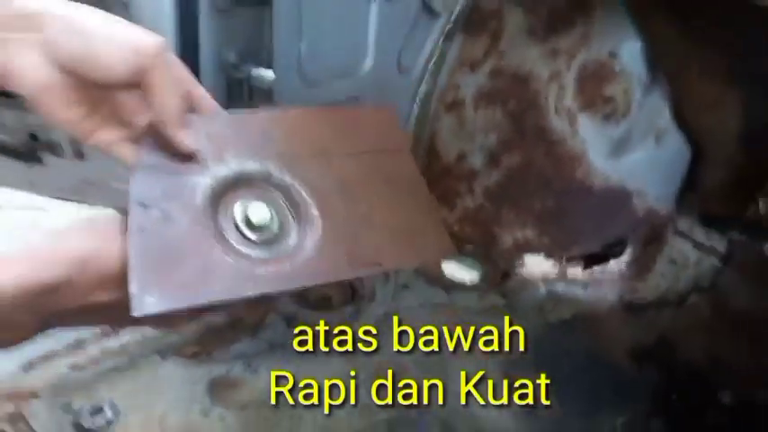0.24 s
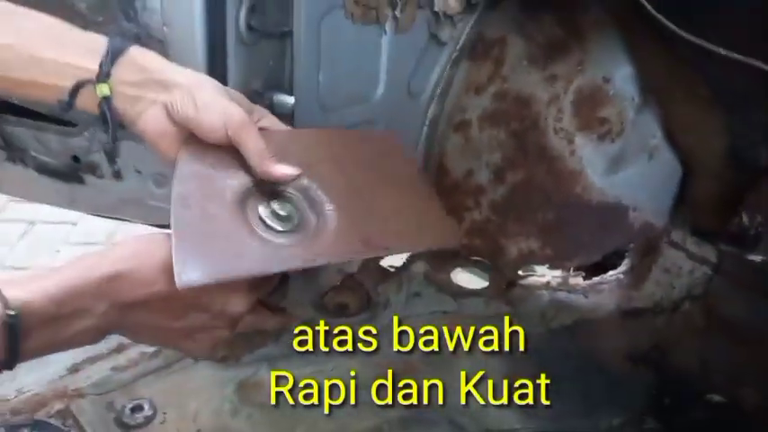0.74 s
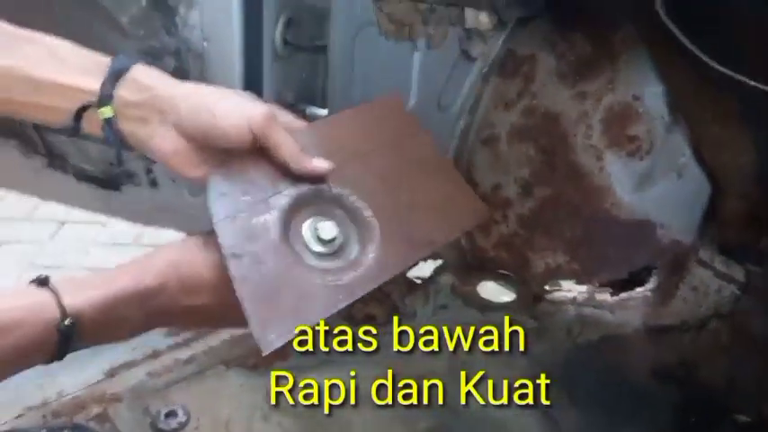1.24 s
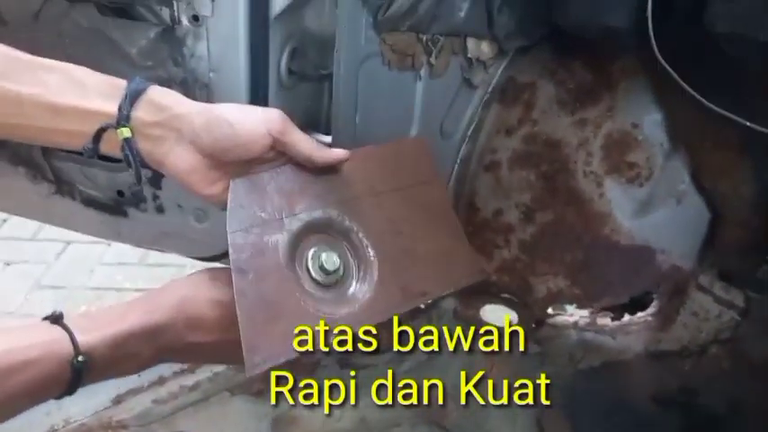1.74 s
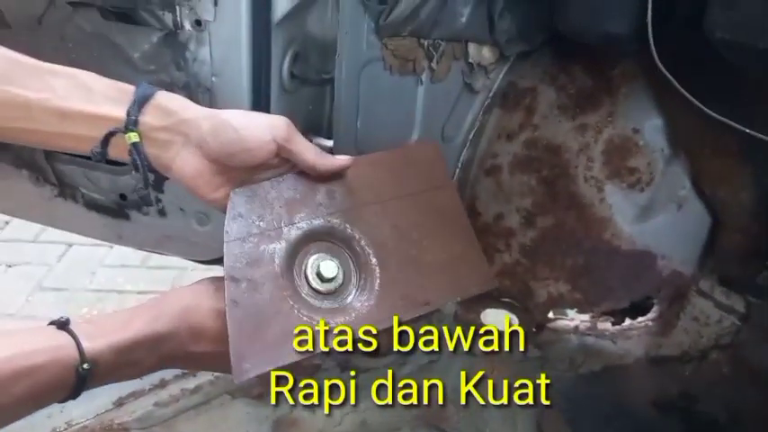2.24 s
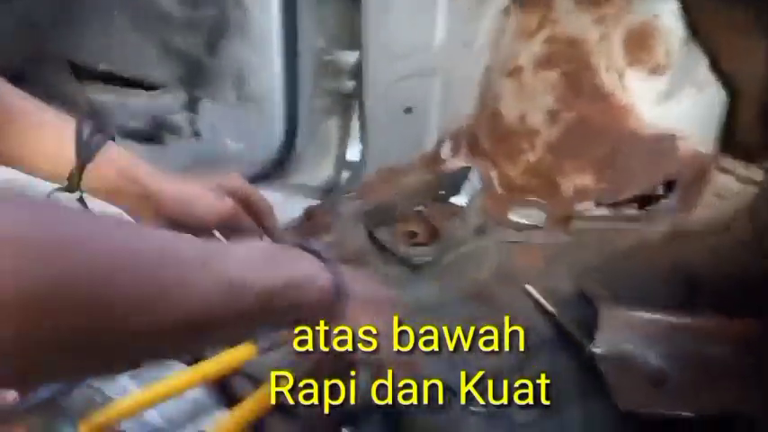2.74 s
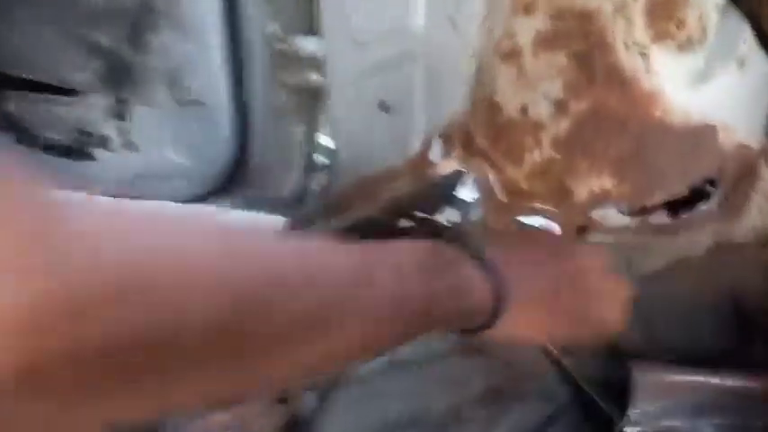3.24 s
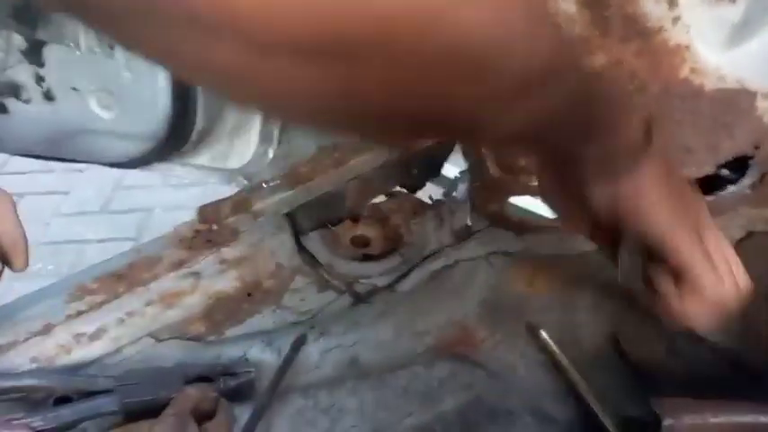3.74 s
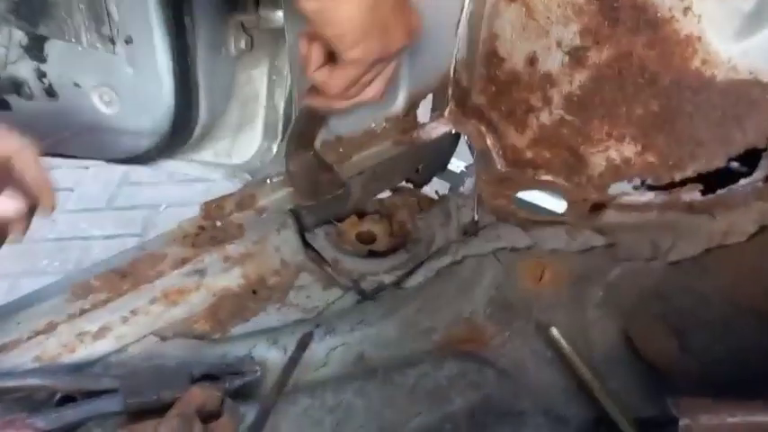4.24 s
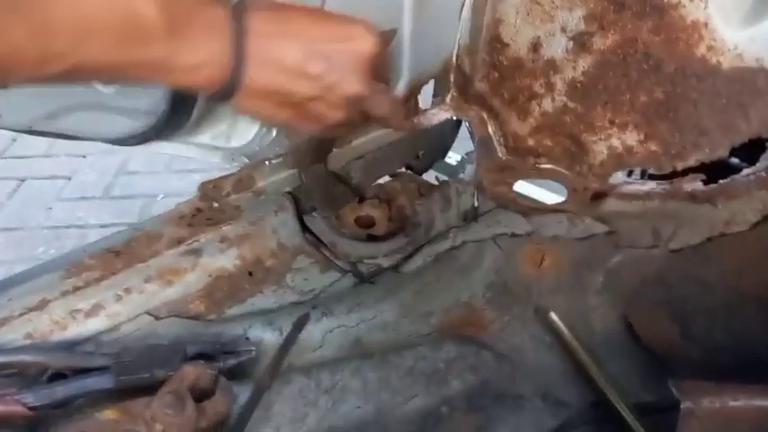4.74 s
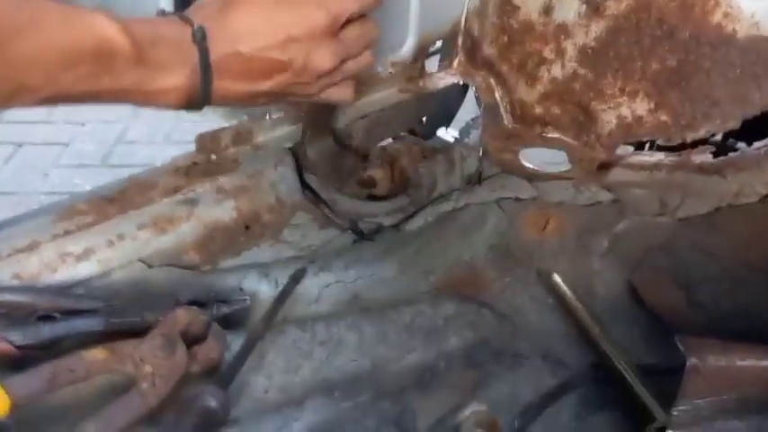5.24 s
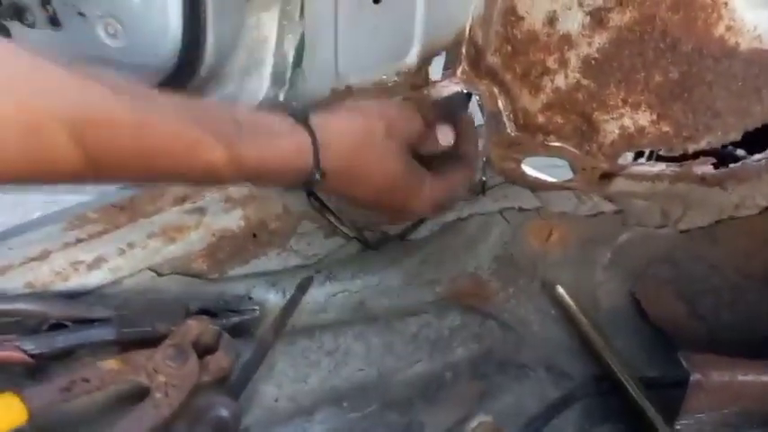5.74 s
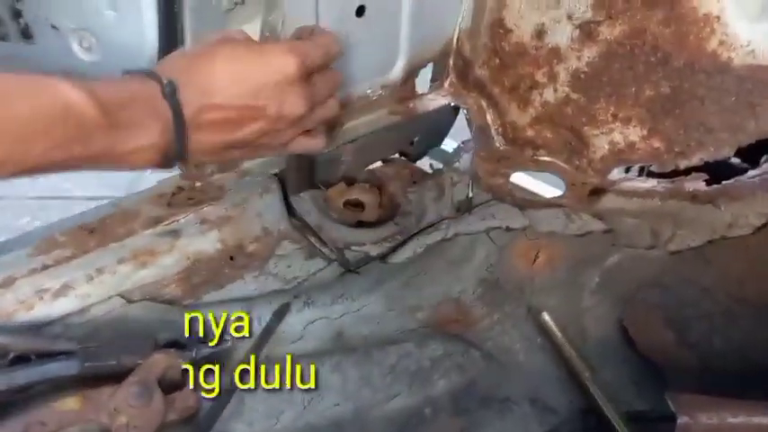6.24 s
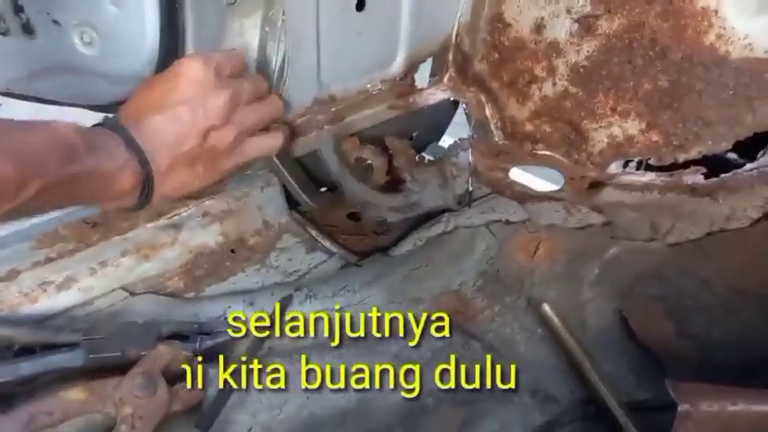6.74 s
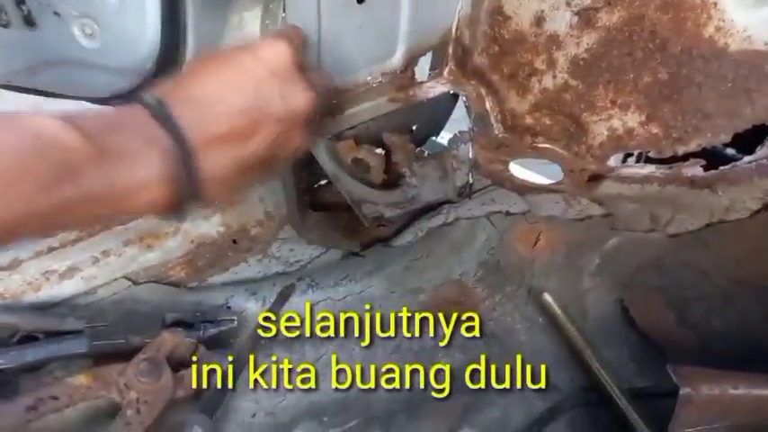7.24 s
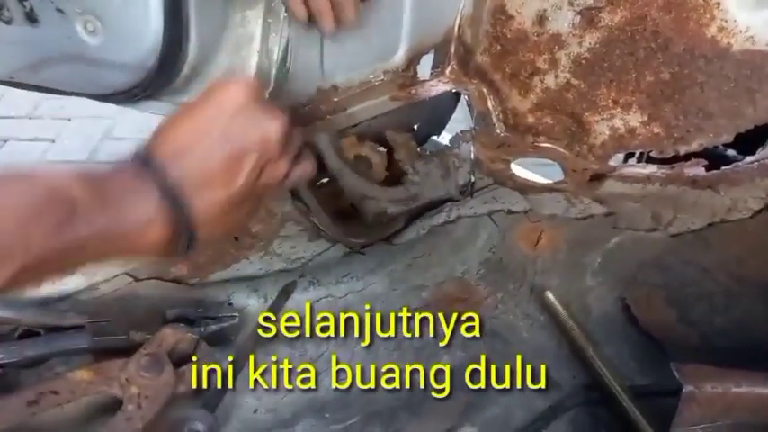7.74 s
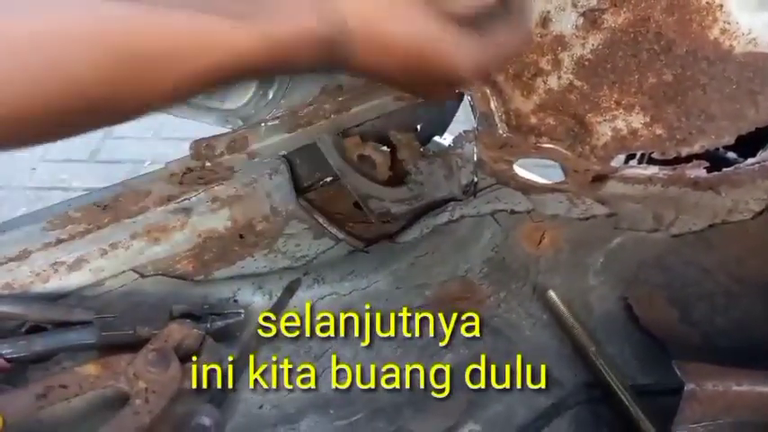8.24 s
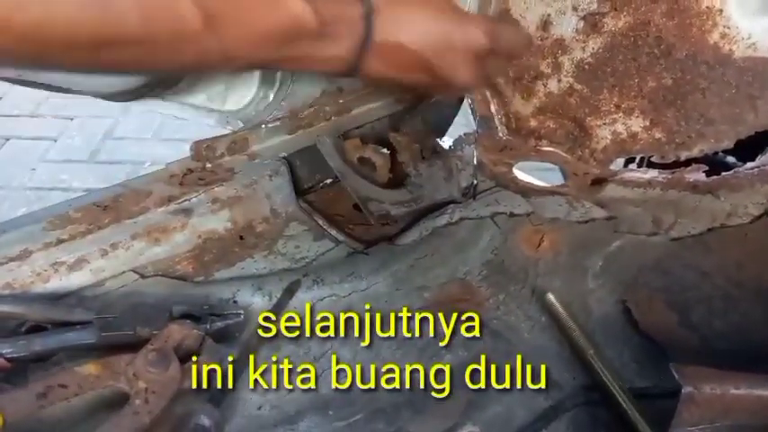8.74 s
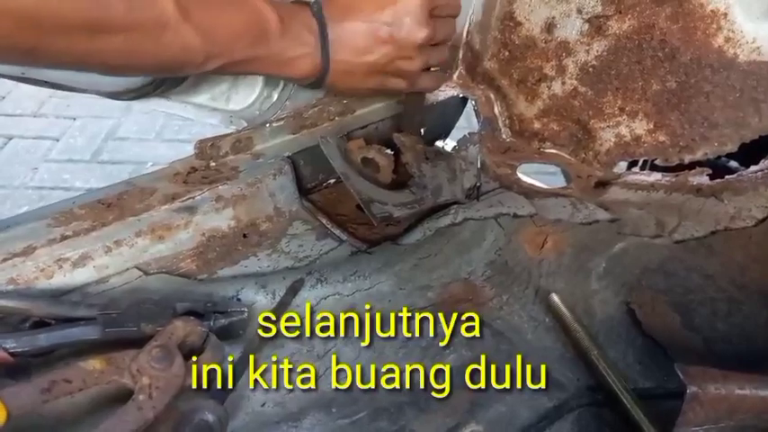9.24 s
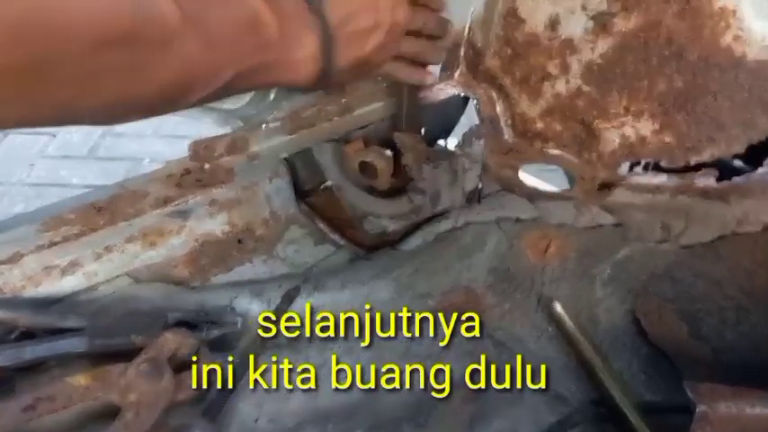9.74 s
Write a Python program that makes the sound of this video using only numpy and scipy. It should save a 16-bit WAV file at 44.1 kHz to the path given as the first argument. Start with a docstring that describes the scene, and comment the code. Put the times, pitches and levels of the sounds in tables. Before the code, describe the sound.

After faint creaks of a metal plate, a chisel pries at rusted car bodywork with uneven knocks, gritty scrapes and clanks.

```python
"""A chisel knocks, bites and slips in a rusted seam of a car's steel floor pan.
Each blow excites the pan's modes, so it booms and clanks; stick-slip friction drives the same modes as
a scrape, rust flakes snap and clink, and the sheet hums. Before this work and a short silence,
a hand-held patch plate creaks against the floor. Two microphone ports stand close by, in an open
workshop with a low rumble."""
import sys
import numpy as np
from scipy import signal
from scipy.fft import rfft, irfft, next_fast_len
from scipy.io import wavfile
from scipy.ndimage import uniform_filter1d, map_coordinates

SR = 44100
rng = np.random.default_rng(int(sys.argv[2]) if len(sys.argv) > 2 else 0)


def wrap_up_sound(samples):
    """Save the sound to the file named by the first command line argument, as 16-bit audio."""
    columns = np.atleast_2d(samples).T
    # keep every value between -1 and 1, then stretch to whole-number steps
    tamed = np.clip(columns, -1, 1)
    steps = np.round(tamed * 32767).astype(np.int16)
    wavfile.write(sys.argv[1], SR, steps)


N = 441000
TIME = np.arange(N) / SR
RING_TIME = np.arange(SR // 2) / SR  # seconds since an excitation
SILENCE_START_S, SILENCE_END_S = 2.387, 2.492

# Levels in the tables are relative: each source adds its own gain.
# likeness of the sound at the two ports: (frequency [Hz], correlation [-])
PORT_CORRELATION = [(150, 0.97), (300, 0.93), (550, 0.71), (1000, -0.00024), (2500, -0.062), (12000, 0.045)]
# workshop rumble and hiss: (frequency [Hz], spectral density [dB])
RUMBLE_SPECTRUM = [(20, -44), (35, -24.5), (50, -7), (68, -2.5), (100, -3), (135, -18.5), (220, -24.5),
                   (500, -36), (1200, -69.5)]
HISS_SPECTRUM = [(100, -12), (300, -4), (550, -2.5), (1000, -9.5), (2000, -13.5), (5800, -19),
                 (7800, -11.5), (9500, -16.5), (16000, -17)]
# rumble during the work: (time [s], level [dB])
RUMBLE_LEVELS = [(2.9, -61.5), (5.15, -62), (7.84, -58), (8.4, -65.5), (8.61, -51.5), (10.0, -61.5)]
# partials of the faint opening tone: (frequency [Hz], level [dB])
OPENING_PARTIALS = [(530, -52.5), (562, -60), (1090, -76)]
# thin tones: (start [s], duration [s], frequency [Hz], level [dB])
THIN_TONES = [(3.003, .18, 2720, -86), (3.228, 0.23, 3430, -70.5), (7.043, 0.048, 3500, -71),
              (7.641, .18, 1470, -77), (8.203, 0.18, 1442, -75.5), (8.295, 0.14, 2710, -80),
              (9.651, 0.059, 1404, -63)]
# slips of the patch plate and ticks of its edge: (time [s], level [dB])
PLATE_CREAKS = [(0.799, -61), (0.813, -60), (.831, -51.5), (0.843, -48), (0.874, -50), (0.899, -50),
                (1.019, -60.5), (1.078, -48), (1.111, -55), (1.385, -69), (1.484, -62.5)]
EDGE_TICKS = [(0.245, -68.5), (1.08, -56), (1.158, -53)]
# fingers sliding on the plate: (start [s], duration [s], level [dB])
SLIDES = [(0.517, 0.21, -78), (1.453, 0.27, -78)]
# hand-damped plate, edge tick, fingers, light rustle, rust snap: (frequency [Hz], spectral density [dB])
PLATE_SPECTRUM = [(200, -27), (580, -3.5), (760, -7), (930, 0.5), (1240, -2), (1490, -3), (1850, -2.5),
                  (2900, -30), (5500, -24), (15000, -30)]
TICK_SPECTRUM = [(1500, -8.5), (4000, -11), (6900, -3.5), (8500, -3), (11000, -14), (13000, -14),
                 (16000, -17)]
FINGER_SPECTRUM = [(1000, -14), (4500, -15), (6300, -11), (7800, 2), (9000, -13), (16000, -12)]
RUSTLE_SPECTRUM = [(100, -25.5), (300, -7), (900, -3), (1400, 0), (2100, -6.5), (3100, -12.5), (5500, -16),
                   (7800, -11), (9700, -19), (12000, -15), (16000, -22)]
SNAP_SPECTRUM = [(2000, -26), (4000, -17), (6500, -18), (7800, -3.5), (9500, -11), (11800, -4),
                 (13000, -10), (14300, -6.5), (16000, -24.5)]
# rustle of hand and tool on the metal: (time [s], level [dB])
RUSTLE_LEVELS = [(2.6, -95), (2.68, -67.5), (3.28, -96), (3.59, -65.5), (4.33, -83.5), (5.5, -84),
                 (5.98, -58.5), (6.27, -84), (6.72, -55.5), (7.03, -84.5), (7.38, -93), (7.48, -71),
                 (8.14, -90), (8.47, -80.5), (8.7, -66.5), (9.13, -63.5), (9.56, -85), (10.0, -61)]
# rust flakes breaking off: (time [s], level [dB])
RUST_SNAPS = [(6.126, -45), (6.371, -50), (6.651, -26.5), (6.735, -47), (8.458, -44), (8.547, -37.5),
              (8.62, -31), (8.924, -35), (9.055, -43), (9.128, -45), (9.263, -49.5), (9.659, -61)]
# a hand leaning on the floor: (time [s], level [dB], t60 [s])
HAND_PUSHES = [(1.13, -40.5, 0.33), (2.531, -26, 0.26), (2.598, -26.5, 0.58)]
# lowest modes of the broad floor: (frequency [Hz], level [dB])
BOOM_MODES = [(68, -4.5), (87, -8), (103, -6.5)]
# a faint high ping, then low hums of the sheet: (time [s], frequency [Hz], level [dB], swell [cycles])
PING_AND_HUMS = [(2.538, 4920, -57, 10), (3.696, 370.3, -29.5, 0.82), (4.361, 249.7, -30.5, 1.8),
                 (6.135, 201, -33.5, 1.5), (7.335, 151, -25.5, 0.51), (7.455, 221.7, -22.5, 1.3),
                 (7.485, 153.6, -22.5, 2.6), (8.636, 229, -10.5, 6.7), (8.949, 229.6, -28, 2.9),
                 (9.26, 228, -42, 5.1), (9.92, 233, -20, 3.2)]
# distinct modes of the floor pan: (frequency [Hz], level [dB], free t60 [s])
PAN_MODES = [(117.3, -17.5, 0.94), (149.2, -10, 0.78), (208.6, -1, 0.24), (231, -1, 0.5), (289, -3, 0.2),
             (308, -8.5, 0.13), (366.8, -4.5, 0.17), (408.9, -3, 0.22), (451.2, 0.5, 0.21),
             (486.5, -0.5, .24), (547, -3.5, 0.27), (690, -3.5, 0.11), (802, -2, 0.069), (977, -5.5, 0.24),
             (1140, 0, 0.062), (1363, -10, 0.22), (1458, -10, 0.23), (1610, -10.5, 0.083),
             (1816, -15.5, 0.09), (1978, -11.5, 0.14), (2520, -18, 0.1), (2850, -25, 0.14)]
# its dense finer modes, struck and rubbed: (frequency [Hz], spectral density [dB])
STRUCK_SPECTRUM = [(60, -30.5), (120, -8.5), (220, 3), (450, -0.5), (750, -5), (1200, -7), (2000, -18.5),
                   (3200, -20.5), (5500, -23), (8000, -24), (12000, -28.5), (16000, -32)]
RUBBED_SPECTRUM = [(60, -28), (140, -12), (230, -6), (500, 3.5), (950, -5.5), (1500, -8), (2100, -15),
                   (3100, -20.5), (4500, -18), (6200, -23), (7800, -19), (9700, -22), (12000, -23),
                   (16000, -22.5)]
# registers thud, knock, clang, crack: (low edge [Hz], high edge [Hz], base t60 [s], base tail t60 [s])
PAN_REGISTERS = [(62.4, 287, 0.33, 0.68), (317, 747, 0.16, 0.49), (755, 2384, 0.14, 0.37),
                 (2820, 15400, 0.11, 0.29)]
# left level minus right: (thud [dB], knock [dB], clang [dB], crack [dB])
REGISTER_BALANCE = (0, -1.5, -2.5, -0.5)
# the registers when scraped (groan, grind, rasp, grit): (offset [dB], slope with sharpness [dB/dB])
SCRAPE_MIX = [(0.5, -0.65), (1, -0.58), (-1, 0.5162), (-5, 0.58)]
# scraping strokes: (start [s], end [s], force [dB], sharpness [dB])
SCRAPE_STROKES = [(2.496, 2.548, -53.5, -13.5), (2.874, 2.945, -58, 9.5), (3.432, 3.579, -55.5, 6),
                  (3.636, 3.743, -48, 2.5), (3.857, 4.05, -60.5, -1.5), (4.289, 4.363, -45, -17),
                  (4.366, 4.405, -43, 2.5), (4.692, 4.742, -51, 2.5), (4.724, 4.764, -49.5, 13),
                  (4.968, 5.119, -54, 4), (5.113, 5.184, -48.5, -2), (5.458, 5.541, -51, -4),
                  (5.598, 5.655, -56, -11), (5.674, 5.752, -55.5, 0.5), (5.779, 5.815, -42.5, 0),
                  (5.906, 5.995, -53.5, -14), (6.037, 6.131, -47, 9), (6.302, 6.443, -61.5, 1),
                  (6.415, 6.473, -50, -3.5), (6.497, 6.533, -46, 3.5), (6.559, 6.646, -36, -4),
                  (6.703, 6.747, -43.5, -7.5), (6.827, 6.867, -41.5, -2.5), (7.456, 7.518, -34, -4),
                  (7.579, 7.671, -49, -5.5), (7.773, 7.875, -59.5, -8), (7.86, 7.922, -35, 2),
                  (7.994, 8.14, -68.5, -16.5), (8.69, 8.729, -41.5, 0), (8.84, 8.906, -43.5, -2),
                  (8.881, 8.98, -37.5, 8.5), (9.025, 9.157, -48.5, 7.5), (9.216, 9.328, -54, 1),
                  (9.364, 9.463, -71, 21), (9.705, 9.809, -55, -1), (9.881, 9.928, -33.5, -7.5),
                  (9.935, 10.008, -48, -9)]
# blows; hardness is the crack of the edge, weight the thud of the arm, both relative to the strength:
# (time [s], strength [dB], hardness [dB], weight [dB], ring length factor [-])
BLOWS = [(2.533, -29.5, -15.5, -1.5, 1.4), (2.704, -35, -31, 0.5, 0.75), (2.864, -48.5, -19, -7.5, 1.3),
         (3.253, -63.5, -32, 2, 1.36), (3.462, -51.5, -5.5, 0.5, 2.5), (3.621, -48, -20, 7.5, 2.6),
         (3.693, -31.5, -34, 3.5, .6), (3.709, -42, -4.5, 1, 0.87), (3.748, -47, -22, 11.5, 0.55),
         (4.227, -36.5, -26.5, -0.5, 0.91), (4.258, -35.5, -24.5, -1, 0.79), (4.358, -29, -21.5, -1, 0.65),
         (4.633, -50.5, -21.5, -2.5, 1.85), (4.89, -63, -47, 4, 0.73), (5.001, -47, -5, -29, 2.3),
         (5.297, -58.5, -7, 2, 1.6), (5.42, -31.5, -31, -5, 1), (5.823, -30.5, -21, -38, 1.03),
         (5.831, -24.5, -22.5, -11.5, 0.36), (5.969, -34, -18, -2.5, 0.79), (6.125, -31.5, -1, -7.5, 0.66),
         (6.546, -39, -15, 2.5, 2), (6.652, -44.5, -4, 10.5, 1.1), (6.704, -30.5, -9, -6.5, 1),
         (6.735, -40.5, 1.5, -3, 0.28), (6.819, -43, -19, 5.5, 1.02), (6.871, -27.5, -21.5, -9, 0.84),
         (7.025, -68.5, -4, 1, 2.1), (7.328, -34, -23.5, 2, 1.7), (7.45, -30.5, -6.5, -9, 1.97),
         (7.481, -29, -11.5, 5.5, 0.35), (7.633, -47.5, -30, 5, .35), (7.824, -52.5, -40, -4.5, .55),
         (7.87, -33, -19.5, -3.5, 0.93), (7.904, -37.5, -19, -6, 1.53), (8.459, -19.5, -15.5, -14.5, 1.43),
         (8.494, -29.5, -21, -8.5, 2.7), (8.547, -35, -7, -13, 0.99), (8.618, -28, -7, 1, 0.67),
         (8.629, -29, -12.5, -4, 0.87), (8.826, -41, -9, 0.5, 1.6), (8.964, -43, -0.5, 7.5, 0.53),
         (9.057, -57.5, 7.5, 7, 0.2), (9.264, -55.5, 7, 12.5, 0.54), (9.355, -52.5, -3.5, -0.5, 0.86),
         (9.745, -51, -38, 10.5, 0.55), (9.912, -19.5, -11.5, -7.5, 0.79)]


def amp(db):
    """Amplitude grows tenfold for every 20 dB."""
    return 10 ** (np.asarray(db) / 20)


def rms(x):
    """Effective amplitude: the root of the mean power over channels and time."""
    return np.sqrt(np.mean(x ** 2, axis=(-2, -1), keepdims=True) + 1e-24)


def along(points, hz):
    """Interpolation of (frequency, value) points on a logarithmic frequency axis."""
    frequencies, values = np.transpose(points)
    return np.interp(np.log(hz + 1), np.log(frequencies + 1), values)


def add(track, s, sound):
    """Superposition: a sound adds to the track from s seconds on."""
    start = round(s * SR)
    part = sound[:, max(-start, 0):max(N - start, 0)]
    track[:, max(start, 0):][:, :part.shape[1]] += part


def wobble(rate, size):
    """Smooth random modulation: a spline through rate knots a second."""
    knots = rng.standard_normal(int(size * rate / SR) + 4)
    return map_coordinates(knots, [np.arange(size) * rate / SR])


def half_phase(hz):
    """Half the phase angle between the ports; their correlation is the cosine of the whole angle."""
    return np.arccos(np.clip(along(PORT_CORRELATION, hz), -1, 1)) / 2


def noise(spectrum, size, ripple_db=None):
    """Partly coherent stereo noise of rms 1; spectral ripple gives it random narrow resonances."""
    n_fft = next_fast_len(size)
    hz = np.fft.rfftfreq(n_fft, 1 / SR)
    knots_hz = np.arange(0, SR / 2, 75)
    ripple = np.interp(hz, knots_hz, ripple_db * rng.standard_normal(len(knots_hz))) if ripple_db else 0
    gain = amp(along(spectrum, hz) + ripple) * [np.cos(half_phase(hz)), np.sin(half_phase(hz))]
    mid, side = irfft(rfft(rng.standard_normal((2, n_fft))) * gain, n_fft)[:, :size]
    pair = np.array([mid + side, mid - side])
    return pair / rms(pair)


def fade(db, t60, t=RING_TIME):
    """Exponential decay: the level falls 60 dB in t60 seconds."""
    return amp(db - 60 * t / t60)


def hum(hz, db, t60, swell_s):
    """A damped oscillator: one mode swells and dies, with a phase difference between the ports."""
    tone = np.sin(2 * np.pi * (hz * RING_TIME + rng.random()) + [[half_phase(hz)], [-half_phase(hz)]])
    return tone * fade(db, t60) * (1 - np.exp(-RING_TIME / swell_s)) ** 2


def workshop():
    """Ambient noise: an uneven rumble and a thin hiss, both stronger after the silence."""
    before_work = TIME < SILENCE_START_S
    rumble_db = np.where(before_work, -68.5, np.interp(TIME, *np.transpose(RUMBLE_LEVELS)))
    hiss_db = np.where(before_work, -81.5, -80)
    rumble = amp(rumble_db + 2 * wobble(5.8, N)) * noise(RUMBLE_SPECTRUM, N)
    return rumble + amp(hiss_db) * noise(HISS_SPECTRUM, N)


def thin_tones():
    """Beating and modulation: close partials waver at the start; later tones flutter at random."""
    out = np.zeros((2, N))
    add(out, 0, sum(hum(hz, db, t60=0.38, swell_s=0.017) for hz, db in OPENING_PARTIALS))
    for s, duration, hz, db in THIN_TONES:
        size = int(duration * SR)
        phase = 2 * np.pi * np.cumsum(hz + 28 * wobble(250, size)) / SR
        flutter = amp(4 * wobble(120, size))
        swell = np.sin(np.linspace(0, np.pi, size))
        add(out, s, amp(db) * swell * flutter * np.sin(phase + [[half_phase(hz)], [-half_phase(hz)]]))
    return out


def patch_plate():
    """Friction on a hand-damped plate: single slips creak, the edge ticks and sliding fingers hiss."""
    out = np.zeros((2, N))
    for s, db in PLATE_CREAKS:
        decay = fade(db - 8.5, t60=0.14) + fade(db - 19.5, t60=0.15)
        add(out, s, decay * noise(PLATE_SPECTRUM, len(RING_TIME), ripple_db=3))
    for s, db in EDGE_TICKS:
        decay = fade(db + 4.5, t60=0.0097) + fade(db - 9, t60=0.22)
        add(out, s, decay * noise(TICK_SPECTRUM, len(RING_TIME), ripple_db=1.7))
    for s, duration, db in SLIDES:
        size = int(duration * SR)
        swell = np.sin(np.pi * np.linspace(0, 1, size) ** 0.6)
        add(out, s, amp(db) * swell * noise(FINGER_SPECTRUM, size))
    return out


def dust_rustle():
    """Granular noise: light contact stirs dust, which trickles on after each stroke."""
    contact = amp(np.interp(TIME, *np.transpose(RUSTLE_LEVELS), left=-120) - 1.5)
    trickle = np.zeros((1, N))
    fall_db_per_s = 169.5
    for _, end, db, sharpness in SCRAPE_STROKES:
        onset_db = db + 0.28 * sharpness - 31
        add(trickle, end, amp(onset_db - fall_db_per_s * RING_TIME)[None])
    grain_db = 1.8 * wobble(25, N) + 1.2 * wobble(750, N)
    return (contact + trickle) * amp(grain_db) * noise(RUSTLE_SPECTRUM, N)


def rust_clinks():
    """Free vibration: each flake broken by a stroke rings at its own pitch, louder under a sharp edge."""
    out = np.zeros((2, N))
    t = RING_TIME[:SR // 12]
    flakes_per_s, centre_hz, range_octaves = 190, 1305, 1.1
    rise = 1 - np.exp(-t / 0.0006)
    for start, end, db, sharpness in SCRAPE_STROKES:
        count = int(flakes_per_s * max(end - start, 0)) + 1
        for place, pitch, size, phase in rng.standard_normal((count, 4)):
            hz = centre_hz * 2 ** (range_octaves * np.tanh(pitch))
            tone = np.sin(2 * np.pi * hz * t + [[phase], [-phase]])
            level_db = db - 12.5 + 0.24 * sharpness + 4 * size
            s = start + (end - start) * (1 + np.tanh(0.66 * place)) / 2
            add(out, s, tone * rise * fade(level_db, t60=0.063, t=t))
    return out


def rust_snaps():
    """Brittle fracture: a flake breaks with a very short, bright tick."""
    out = np.zeros((2, N))
    t = RING_TIME[:SR // 8]
    rise = 1 - np.exp(-t / 0.0005)
    decay = fade(5, t60=0.034, t=t) + fade(-16, t60=0.18, t=t)
    for s, db in RUST_SNAPS:
        add(out, s, amp(db) * rise * decay * noise(SNAP_SPECTRUM, len(t), ripple_db=7))
    return out


def floor_booms():
    """Flexural vibration: a leaning hand or the weight of a blow excites the floor's lowest modes."""
    out = np.zeros((2, N))
    boom_db, boom_t60_s = -13.5, 0.78
    blow_pushes = [(s, db + weight + boom_db, boom_t60_s) for s, db, _, weight, _ in BLOWS]
    for s, db, t60 in list(HAND_PUSHES) + blow_pushes:
        add(out, s, sum(hum(hz, db + mode_db, t60, swell_s=0.002) for hz, mode_db in BOOM_MODES))
    return out


def ping_and_sheet_hums():
    """Damped oscillation: a faint high ping at 2.5 s, then low hums of the sheet, each in one mode."""
    out = np.zeros((2, N))
    for s, hz, db, cycles in PING_AND_HUMS:
        add(out, s, hum(hz, db, t60=0.26, swell_s=cycles / hz))
    return out


def floor_pan():
    """Modal decomposition: a decaying phasor for each mode, and a band-pass for each register."""
    hz, db, t60 = np.transpose(PAN_MODES)[:, :, None]
    phasors = fade(db, t60) * np.exp(2j * np.pi * hz * RING_TIME)
    bands = [signal.butter(4, [low, high], 'band', fs=SR, output='sos') for low, high, *_ in PAN_REGISTERS]
    return phasors, bands


def pan_response(pan, spectrum, ring_factor, modes_db, tail_db, attack_s, scatter_db, ripple_db):
    """The pan's impulse response, by register; every contact point weights the modes anew."""
    phasors, bands = pan
    hz = np.transpose(PAN_MODES)[0]
    weights = amp(scatter_db * rng.standard_normal(len(hz))) * np.exp(2j * np.pi * rng.random(len(hz)))
    port_shifts = np.exp(1j * np.outer([1, -1], half_phase(hz)))
    modes = amp(modes_db) * ((weights * port_shifts) @ phasors).real
    dense_modes = noise(spectrum, len(RING_TIME), ripple_db)
    rise = 1 - np.exp(-(RING_TIME / attack_s) ** 2)
    # a tool that stays pressed on the sheet damps it
    damping_per_s = 12 * max(1 / ring_factor - 1, 0)
    modes *= np.exp(-damping_per_s * RING_TIME)
    registers = []
    for band, (_, _, t60, tail_t60) in zip(bands, PAN_REGISTERS):
        decay = fade(0, t60 * ring_factor) + fade(tail_db, tail_t60 * np.sqrt(ring_factor))
        registers.append(signal.sosfilt(band, rise * (dense_modes * decay + modes)))
    return np.array(registers)


def mix_registers(levels_db, registers, size):
    """Band summation: each register is set to its level over size samples and to its stereo balance."""
    gain = amp(np.asarray(levels_db)[:, None] + np.outer(REGISTER_BALANCE, [0.5, -0.5]))
    return np.sum(gain[..., None] * registers / rms(registers[..., :size]), axis=0)


def chisel_ring():
    """Resonance: once wedged in the seam, the steel rings faintly with each stroke."""
    out = np.zeros((2, N))
    wedged_from_s = 7.4
    for start, end, db, _ in SCRAPE_STROKES:
        if start > wedged_from_s:
            add(out, (start + end) / 2, hum(hz=1450, db=db - 27.5, t60=0.6, swell_s=0.01))
    return out


def stick_slip(size, jerks_per_s, spread_db):
    """Stick-slip friction over rust: a random train of uneven impulses whose strength comes in clumps."""
    slipping = rng.random(size) < jerks_per_s / SR
    jerks = slipping * rng.standard_normal(size) * amp(spread_db * rng.standard_normal(size))
    # the hand leans in and eases off
    progress = np.linspace(0, 1, size)
    pressure = np.sin(np.pi / 2 * np.clip(np.minimum(progress, 1 - progress) / 0.22, 0, 1))
    return jerks * pressure * amp(wobble(94.4, size))


def chisel_scrapes(pan):
    """Forced vibration: the edge's jerks drive the damped pan; a sharp edge rasps, a flat one groans."""
    out = np.zeros((2, N))
    offset_db, slope = np.transpose(SCRAPE_MIX)
    usual_force_db = -48
    for start, end, db, sharpness in SCRAPE_STROKES:
        size = round((end - start) * SR)
        # a harder push breaks off more uneven flakes
        drive = stick_slip(size, jerks_per_s=1800, spread_db=6 + 0.22 * (db - usual_force_db))
        response = pan_response(pan, RUBBED_SPECTRUM, ring_factor=0.46, modes_db=-12, tail_db=-18,
                                attack_s=0.000081, scatter_db=3, ripple_db=5.5)
        registers = signal.fftconvolve(response, drive[None, None], axes=-1)
        add(out, start, mix_registers(db + offset_db + slope * sharpness, registers, size))
    return out


def chisel_knocks(pan):
    """Impact excitation: hard contacts reach the pan's upper registers, heavy ones the lowest."""
    out = np.zeros((2, N))
    usual_hardness_db = -13
    for s, db, hardness, weight, ring_factor in BLOWS:
        harder_db = hardness - usual_hardness_db
        knock_db = 0.5 - 0.18 * harder_db + 0.017 * weight
        clang_db = -2 + 0.15 * harder_db - 0.17 * weight  # a light, glancing blow clangs more
        bite_s = 0.00048 * amp(0.02 * db)  # every blow sets in sharply, within about half a millisecond
        registers = pan_response(pan, STRUCK_SPECTRUM, ring_factor, modes_db=-14.5, tail_db=-22.5,
                                 attack_s=bite_s, scatter_db=7.5, ripple_db=4)
        levels_db = db + np.array([weight, knock_db, clang_db, hardness])
        add(out, s, mix_registers(levels_db, registers, size=SR // 50))
    return out


def scene():
    """Superposition of tool, plate, floor pan and workshop at the two ports."""
    pan = floor_pan()
    contacts = amp(-3) * chisel_knocks(pan) + amp(-6) * chisel_scrapes(pan)
    tool = contacts + rust_snaps() + dust_rustle() + chisel_ring()
    work = tool + patch_plate() + ping_and_sheet_hums() + floor_booms()
    return work + thin_tones() + workshop() + rust_clinks()


def record(dry):
    """Gating and band limiting: the sound falls silent for a moment, and the top treble is cut steeply."""
    sounding = (TIME < SILENCE_START_S) | (TIME > SILENCE_END_S)
    gate = uniform_filter1d(1.0 * sounding, size=200)
    n_fft = next_fast_len(N + SR // 2)
    cutoff_hz = 15780
    passband = 1 / (1 + (np.fft.rfftfreq(n_fft, 1 / SR) / cutoff_hz) ** 150)
    return irfft(rfft(dry * gate, n_fft) * passband, n_fft)[:, :N]


dry = scene()
out = record(dry)
wrap_up_sound(out)
```